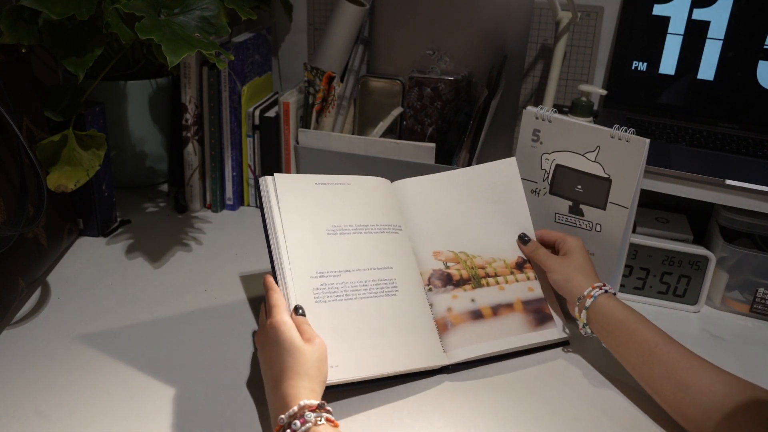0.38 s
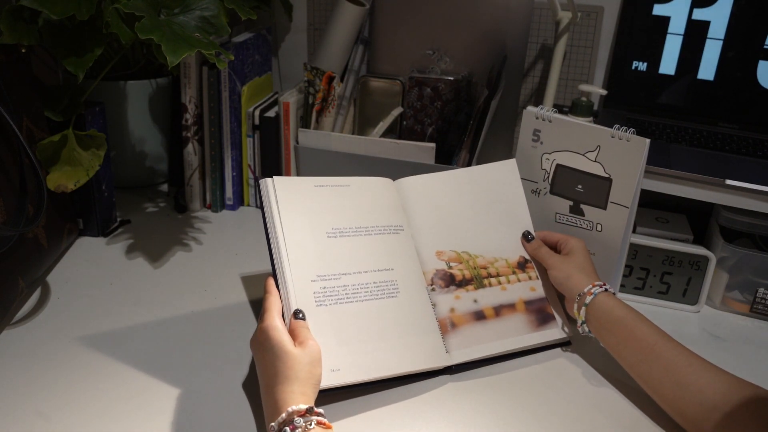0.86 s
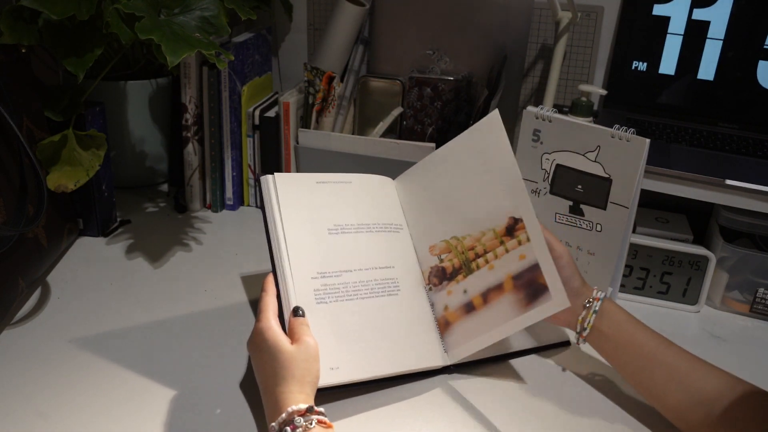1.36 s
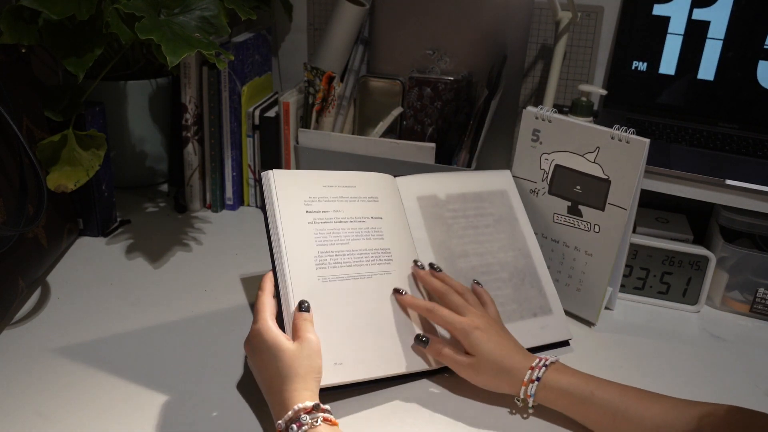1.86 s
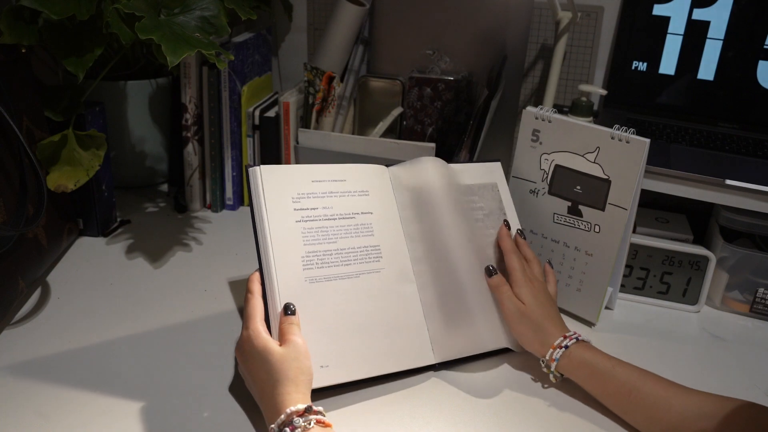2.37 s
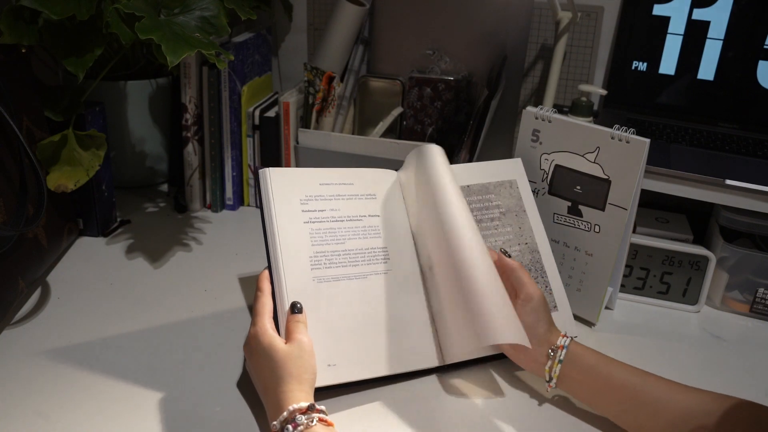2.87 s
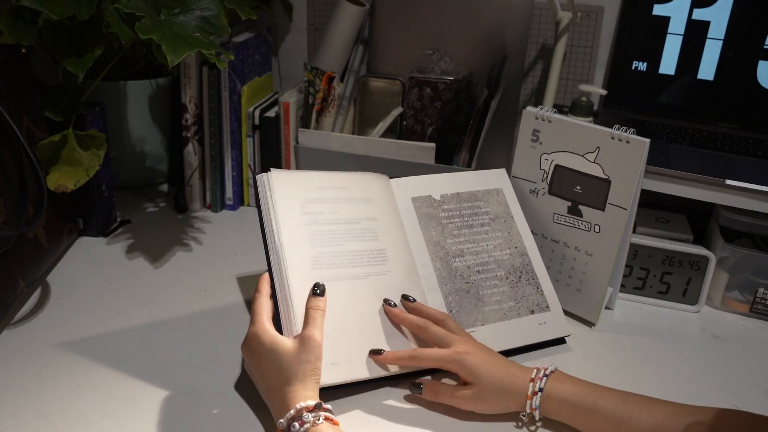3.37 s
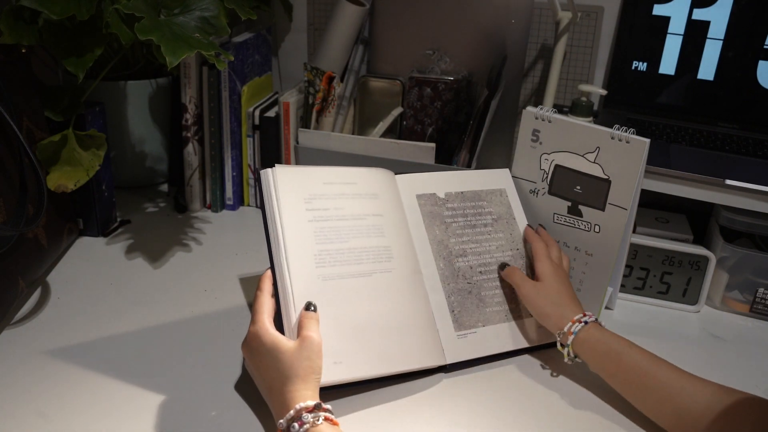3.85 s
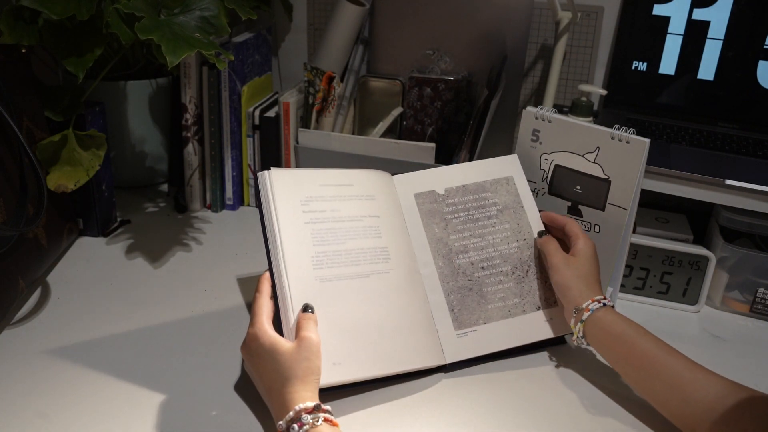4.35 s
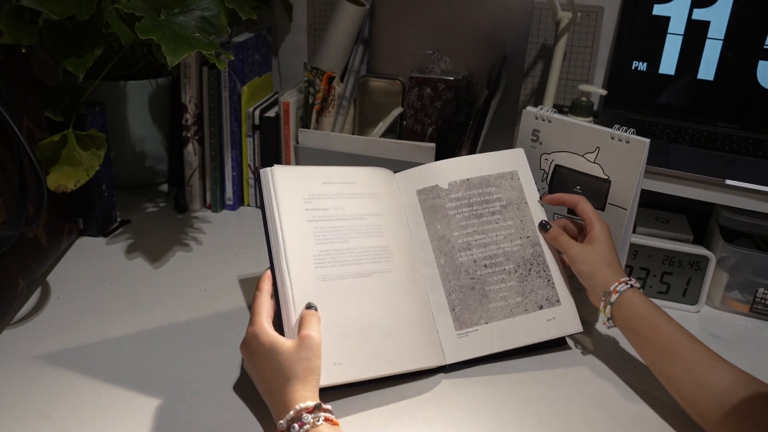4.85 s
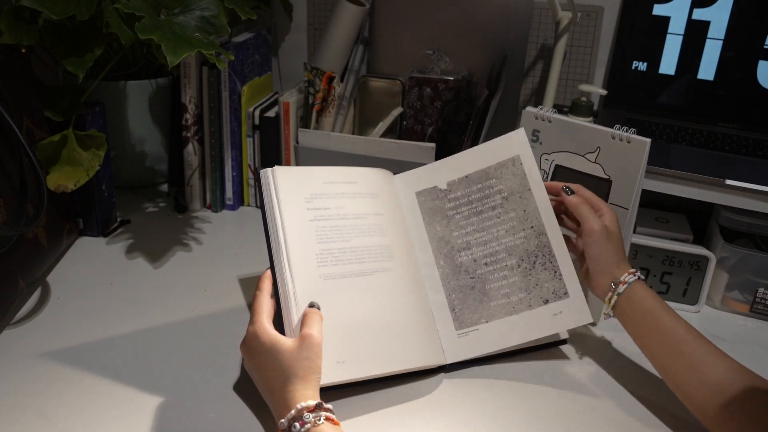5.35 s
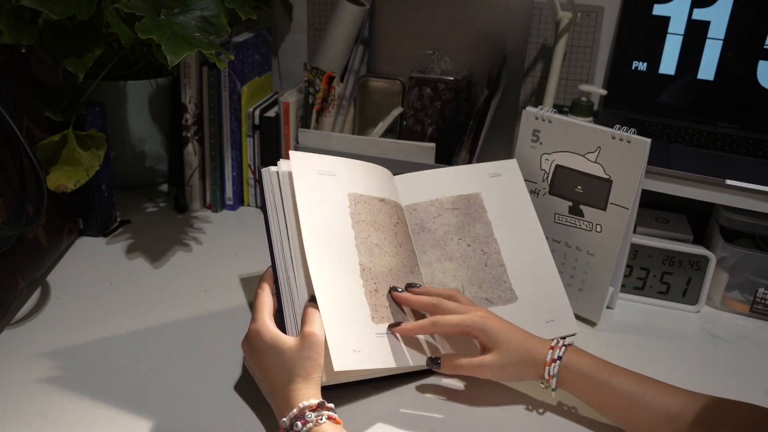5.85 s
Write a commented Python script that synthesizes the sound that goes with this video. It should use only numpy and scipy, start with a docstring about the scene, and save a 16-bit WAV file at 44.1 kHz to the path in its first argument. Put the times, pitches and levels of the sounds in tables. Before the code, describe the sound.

A thick book is handled close to two microphones in a small, quiet room with short, soft echoes and a faint low hum. From 0 to 1.2 s there are only light ticks and small scuffs as fingers pick at a stiff page. At about 1.25 s it lifts with a crackle; fluttering rustle and soft air puffs around 1.5 s lead to a firm snap at 1.65 s. A brief dry slide follows near 2 s, then a stronger hissing swish and crisp snaps at 2.3-2.5 s. The second turn is loudest: dense crackles at 2.8-3.05 s and two very sharp, bright snaps near 3.15 s. A hand smooths the paper with a dry hiss at 3.5-3.8 s. Mostly quiet picking with faint low ticks lasts until 4.9 s. Grainy rustles and small clicks return around 5-5.2 s, and a gentler, breathy page turn with light crackles runs from 5.4 s to the end.

```python
"""Sharp snaps and short crackles over a grainy rustle and a dry hiss: stiff pages of a thick book are picked at,
lifted, turned and smoothed by hand on a desk in a small quiet room, with a faint hum and room noise below.
Buckles ring the sheet by damped resonators; friction grains, filtered in bands, make rustle and hiss; air puffs
are swells of low noise. Two close microphones hear it, the right one a little earlier and brighter; dense
decaying echoes add the room."""
import sys
import numpy as np
from scipy import signal
from scipy.fft import rfft, irfft, next_fast_len
from scipy.io import wavfile

SR = 44100
rng = np.random.default_rng(int(sys.argv[2]) if len(sys.argv) > 2 else 0)


def generate_wav(signal):
    """Clip the signal to [-1, 1] and save it as 16-bit WAV at the path in sys.argv[1]."""
    frames = np.transpose(np.atleast_2d(signal))
    scaled = np.clip(frames, -1, 1) * 32767
    pcm = np.round(scaled).astype(np.int16)
    wavfile.write(sys.argv[1], SR, pcm)


def undo_db(level):
    """Turn decibels back into plain size, where 20 dB means ten times bigger."""
    steps = np.asarray(level, float) / 20
    return 10 ** steps


N = 263277   # length [samples]
EDGES_HZ = 20 * 2 ** np.arange(0, 10, .5)   # half-octave band edges

# Room noise: shape before scaling to AIR_DB (frequency [Hz], relative level [dB])
AIR_SHAPE = [(12, -32), (20, 0.5), (49, 0.5), (101, -8), (292, -4), (397, -13), (754, -10), (1110, -16.5),
             (1250, -18), (1950, -20), (7440, -28.5), (15800, -35.5)]
# Room noise at the two microphones (frequency [Hz], left-right likeness [0..1])
AIR_LIKENESS = [(60, 1), (240, 0.94), (950, 0.17), (3770, 0.0), (15000, 0.34)]
AIR_DB = -53   # rms
HUM_HZ, HUM_WIDTH_HZ, HUM_DB = 148, 5, -61.5

# Echoes at the two microphones (frequency [Hz], left-right likeness [0..1])
ECHO_LIKENESS = [(150, 1), (600, 0.84), (1500, 0.23), (4000, 0.025)]
# Time the echoes take to fall by 60 dB (frequency [Hz], time [s])
ECHO_T60 = [(300, 0.55), (1000, 0.19), (2800, 0.18), (7000, 0.15), (14000, 0.13)]
# Tone of the echoes (frequency [Hz], relative level [dB])
ECHO_COLOUR = [(200, -6), (1000, -1.5), (3000, -3), (8000, 3.5), (15000, 0)]
# Treble shading at the left microphone (frequency [Hz], gain [dB])
LEFT_SHADE = [(2500, 0), (4500, -.5), (8000, -6), (15000, -4)]
LEFT_LAG_S = 4.5e-5

# Air pushed out from under the page (time of the top [s], rms level before the swell [dB], centre [Hz])
PUFFS = [(.04, -49.5, 402), (0.699, -51, 61), (1.293, -46.5, 260), (1.556, -45, 143), (1.545, -42.5, 300),
         (1.57, -46, 327), (2.482, -46.5, 440), (2.561, -48.5, 270), (2.859, -47, 276), (3.03, -48, 304),
         (4.335, -50.5, 300), (5.62, -47, 283), (5.65, -46, 270)]

# A finger or a page slides, one stroke a row
# (start [s], length [s], sheet rustle level [dB], rustle centre [Hz], surface hiss level in mid-stroke [dB])
STROKES = [(0.0, 0.097, -55, 1250, -64), (0.327, 0.037, -64.5, 1500, -69), (0.585, 0.14, -55, 1180, -63.5),
           (0.99, .23, -56, 1050, -70), (1.311, 0.019, -45.5, 1180, -48), (1.41, 0.096, -42.5, 890, -56),
           (1.54, 0.13, -47, 1920, -44), (1.68, 0.16, -49.5, 1300, -55.5), (1.893, 0.013, -46.5, 1480, -42),
           (2.003, 0.056, -46.5, 2150, -48), (2.076, 0.079, -61.5, 2120, -54.5),
           (2.285, 0.15, -41.5, 2400, -37.5), (2.445, .15, -48, 1820, -40), (2.65, .11, -50, 1450, -55),
           (2.82, 0.065, -39, 1910, -44), (2.938, 0.023, -37, 2100, -37.5), (3.044, 0.07, -37.5, 1880, -68),
           (3.157, 0.016, -30, 2580, -49), (3.262, 0.086, -52, 2830, -53.5),
           (3.555, 0.12, -42.5, 2200, -38), (3.712, 0.078, -49.5, 2310, -46.5),
           (3.895, 0.032, -56, 1900, -49.5), (4.0, 0.015, -60, 895, -60), (4.443, 0.12, -60.5, 1330, -71),
           (4.938, 0.066, -46.5, 1370, -46.5), (5.104, 0.057, -43, 1420, -47),
           (5.33, 0.017, -58.5, 1340, -74), (5.408, 0.065, -51.5, 1720, -44.5), (5.529, .04, -51, 794, -54),
           (5.577, 0.059, -41.5, 1680, -44.5), (5.732, 0.064, -39, 2070, -42.5),
           (5.821, .1, -48, 1880, -49.5)]
# Tone of the surface hiss (frequency [Hz], relative level [dB])
HISS_SHAPE = [(1500, -48), (2500, 9.5), (4000, 4), (6000, 3.5), (8500, 4), (11000, -1.5), (15500, -8)]
RISE_DB_PER_S, FALL_DB_PER_S = 318, 207   # before and after a stroke
HISS_STEEPER, HISS_ARCH_DB = 1.14, 5   # the hiss follows speed: steeper flanks, loudest in mid-stroke
LET_GO_S, LET_GO_DB_PER_S = .012, 2500   # a stroke that starts this near a snap rises at this rate

# The sheet crinkles in a swelling burst (time of the top [s], rms level of the ring before the swell [dB],
# ring [Hz], edge level against the ring [dB], half length [s])
CRINKLES = [(0.021, -35, 1660, -16, 0.0051), (0.315, -46, 1600, -9, 0.0097),
            (0.466, -52.5, 1420, -6.5, 0.013), (0.601, -49.5, 1270, -27, 0.0073),
            (1.292, -30.5, 1120, -11, 0.0042), (1.415, -37, 670, -28, 0.0033),
            (2.568, -26, 1350, -7.5, 0.0068), (2.827, -21.5, 1750, -3, 0.0097),
            (2.851, -29.5, 1290, -10, 0.0079), (2.88, -31, 1670, -21, 0.0051),
            (3.035, -21.5, 2050, -36, 0.012), (3.725, -33, 2260, -27, 0.0072),
            (3.913, -46, 2400, 2.5, 0.0063), (4.984, -42, 1240, -28, 0.042), (5.131, -33, 1440, -6, 0.01),
            (5.434, -41, 744, -20, 0.01), (5.63, -43, 1520, -20, 0.022), (5.583, -34.5, 2840, -0.5, 0.007),
            (5.849, -36.5, 2460, -36, 0.015)]
# The sheet buckles (time [s], peak level of the ring [dB], ring [Hz], edge crack level against the ring [dB])
SNAPS = [(0.0167, -42, 1980.0, -25), (0.0312, -30, 1370, -21), (0.1209, -31.5, 1620, -13),
         (0.466, -29.5, 1430, -18), (0.4995, -38, 1960.0, -11), (0.669, -25, 1410, -5),
         (1.244, -28, 1040, -11), (1.2875, -21.5, 1810, -15), (1.2969, -26.5, 910, -21.0),
         (1.4105, -43, 745, 0), (1.464, -30, 1250, -2), (1.5125, -23.5, 750, -25), (1.523, -19, 1890, -7.5),
         (1.5305, -26, 1730, -8), (1.5372, -17, 1950, -5.5), (1.5474, -19.5, 1510, -5),
         (1.6528, -9.5, 1340, -14), (1.6574, -23, 1730, -30), (2.3343, -12.5, 1760, -25),
         (2.3726, -10.5, 2330, -12), (2.38, -23, 2300, -22), (2.4231, -20.5, 1330, -10),
         (2.472, -12, 1340, -6.5), (2.4797, -8, 1530, -26), (2.6484, -25.5, 1030, -23.0),
         (2.7112, -22, 2160, -18), (2.7193, -23.5, 1240, -22.0), (2.8371, -7, 1930, -27),
         (2.8522, -10.5, 2460, -2), (2.8649, -10.5, 1540, 1), (2.8697, -8.5, 1850, -1),
         (2.8983, -3.5, 1980, -25), (2.9045, -6.5, 2450, -12), (2.912, -14, 2190, -7),
         (2.973, -11.5, 2520, -17), (3.0096, -18.5, 1540, -23), (3.0253, -11.5, 2330, -12),
         (3.15, -2.5, 2900, -11), (3.163, -4.5, 2950, -8.5), (3.216, -24, 2870.0, -15),
         (3.3084, -25.5, 3030, -18), (3.8952, -35.5, 2150, -13), (4.3322, -28.5, 726, -22),
         (4.413, -33, 630, -29), (4.4791, -30.5, 1700, -13), (5.1941, -29, 1760, -8),
         (5.209, -29, 1680, -6), (5.4034, -28, 1450, 2.5), (5.5715, -33, 2340, -7), (5.7099, -38, 2230, -8),
         (5.917, -33, 3520, -11)]
SHEET_CYCLES = 3.5   # cycles in which the main ring falls by 60 dB
EDGE_HZ = (4800, 8500)   # band of the page edge
CUTOFF_HZ = 16300   # from here up the low-pass takes away at least 50 dB


def rms_one(x):
    """Scale to rms 1."""
    return x / np.sqrt(np.mean(x ** 2) + 1e-20)


def at_hz(points, hz):
    """Read a table on a log-frequency axis."""
    table_hz, value = np.array(points).T[:2]
    return np.interp(np.log(hz), np.log(table_hz + 1), value)


def drift(rate):
    """Slow random wander of rms 1, low-passed near the rate in Hz."""
    pole = np.exp(-40 * np.pi * rate / SR)
    draws = rng.standard_normal(N // 20 + 2002)   # one draw in 20 samples
    slow = signal.lfilter([1], [1, -2 * pole, pole * pole], draws)[2000:]
    return np.interp(np.arange(N) / 20, np.arange(len(slow)), rms_one(slow))


def ring(x, hz, t60):
    """Damped resonator: a unit click sets a sine ringing that falls by 60 dB in t60 seconds."""
    r, w = undo_db(-60 / (t60 * SR)), 2 * np.pi * hz / SR
    return signal.lfilter([0, np.sin(w)], [1, -2 * r * np.cos(w), r * r], x + 1e-18)


def bands(source):
    """Half-octave bands of two unrelated sources dealt in turn: (centre Hz, band)."""
    for k, (low, high) in enumerate(zip(EDGES_HZ, EDGES_HZ[1:])):
        sos = signal.butter(2, [low, high], "band", fs=SR, output="sos")
        yield np.sqrt(low * high), signal.sosfilt(sos, source[k % 2])


def spread(pair, alike):
    """Mix two unrelated noises into left and right of a given likeness."""
    alike = np.clip(alike, 0, 1)
    return np.sqrt(1 + alike) * pair[0] + np.sqrt(1 - alike) * pair[1] * [[1], [-1]]


def air():
    """Steady room noise in bands, and a narrow wavering hum from a resonator driven by noise."""
    noise = 0
    for hz, pair in bands(rng.standard_normal((2, 2, N))):
        gain = undo_db(at_hz(AIR_SHAPE, hz) + 0.26 * drift(52))
        noise = noise + gain * spread(pair, at_hz(AIR_LIKENESS, hz))
    hum = ring(rng.standard_normal(N), HUM_HZ, 2.2 / HUM_WIDTH_HZ)
    return undo_db(AIR_DB) * rms_one(noise) + undo_db(HUM_DB) * rms_one(hum)


def echoes(first_s=0.0035):
    """Dense reflections that die band by band, after a short gap."""
    t = np.arange(SR // 2) / SR
    echo = 0
    for hz, pair in bands(rng.standard_normal((2, 2, len(t)))):
        fall_db = 60 * t / at_hz(ECHO_T60, hz)
        echo = echo + undo_db(at_hz(ECHO_COLOUR, hz) - fall_db) * spread(pair, at_hz(ECHO_LIKENESS, hz))
    echo = echo * np.clip(t / first_s - 1, 0, 1)
    return echo / np.sqrt(np.sum(echo ** 2) / 2)


def room(x, count=5):
    """The sounding spot wanders over the page: the sound fades from one set of echo paths to the next."""
    turn = np.arange(N) / SR / .011   # a new set every 11 ms, in a cycle
    wet = 0
    for k in range(count):
        share = np.clip(1 - np.abs((turn - k) % count - 1), 0, 1)
        wet = wet + signal.fftconvolve((share * x)[None], echoes(), axes=1)[:, :N]
    return wet


def puffs(half_s=0.012, cycles=4.9):
    """Air pushed out from under the page: a short swell of low noise around one pitch."""
    out, t = np.zeros(N + 4096), np.arange(-2048, 2048) / SR
    for (s, rms_db, hz), shake in zip(PUFFS, rng.standard_normal((len(PUFFS), 8192))):
        once = ring(shake, hz, cycles / hz)
        low = rms_one(ring(once, hz, cycles / hz)[4096:])
        swell = np.exp(-(t / max(half_s, 3.7 / hz)) ** 2 / 2)   # low pitches swell longer
        at = round(s * SR)
        out[at:at + 4096] += undo_db(rms_db) * low * swell
    return out[2048:N + 2048]


def grains(per_s, scatter_db, clump_db, channels):
    """Stick-slip clicks of uneven size that come in clumps."""
    born = rng.random((channels, N)) < per_s * undo_db(clump_db * drift(40)) / SR
    size_db = scatter_db * np.minimum(rng.exponential(1, (channels, N)), 4)
    sizes = undo_db(size_db) * rng.choice([-1, 1], (channels, N))
    return rms_one(born * sizes + 1e-9)


def strokes():
    """Each stroke rises, holds and falls; overlapping strokes add and the louder one dominates the centre."""
    t, snap_s = np.arange(0, N + 64, 64) / SR, np.array(SNAPS)[:, 0]
    start, length, rustle_db, hz, hiss_db = np.array(STROKES).T[:, :, None]
    sudden = np.min(np.abs(start - snap_s), axis=1, keepdims=True) < LET_GO_S
    rise_db = np.where(sudden, LET_GO_DB_PER_S, RISE_DB_PER_S) * np.clip(start - t, 0, None)
    flank_db = rise_db + FALL_DB_PER_S * np.clip(t - start - length, 0, None)
    off_middle = np.clip(2 * (t - start) / length - 1, -1, 1)
    # powers, so that strokes add as unrelated sounds
    rustle = undo_db(np.maximum(rustle_db - flank_db, -200)) ** 2
    hiss = undo_db(hiss_db - HISS_STEEPER * flank_db - HISS_ARCH_DB * off_middle ** 2) ** 2
    centre_hz = np.exp(np.sum(rustle * np.log(hz), axis=0) / rustle.sum(axis=0))
    curves = (np.sqrt(rustle.sum(axis=0)), centre_hz, np.sqrt(hiss.sum(axis=0)))
    return [np.interp(np.arange(N) / SR, t, curve) for curve in curves]


def sliding(below_db=4.0, above_db=7.5, focus_db=0.0, patchy_db=2.5):
    """Friction grains shake the sheet around a moving centre (slopes per octave) and hiss on its surface."""
    rustle_gain, centre_hz, hiss_gain = strokes()
    rustle, power, hiss = 0, 0, 0
    for hz, band in bands(grains(3000, scatter_db=2.5, clump_db=4.5, channels=2)):
        if hz > 300:
            octaves = np.log2(hz / centre_hz)
            slope_db = np.minimum(below_db * octaves, -above_db * octaves)
            gain = undo_db(slope_db + focus_db * np.exp(-(octaves / 0.26) ** 2))
            patches = undo_db(patchy_db * (drift(32) + drift(7.2)))
            rustle = rustle + gain * patches * band
            power = power + gain ** 2 * band.var()
    fine = grains(9000, scatter_db=2.5, clump_db=5.0, channels=4).reshape(2, 2, N)
    for hz, pair in bands(fine):
        if hz > 1200:
            flicker_db = 1.5 * drift(30)
            # a wide contact: the two sides differ
            hiss = hiss + undo_db(at_hz(HISS_SHAPE, hz) + flicker_db) * spread(pair, 0.05)
    return rustle_gain * rustle / np.sqrt(power), hiss_gain * rms_one(hiss)


def sheet(slips, hz):
    """A soft buckle rings the sheet a few cycles at two pitches; it radiates no bass."""
    sos = signal.butter(2, [0.63 * hz, 3.18 * hz], "band", fs=SR, output="sos")
    soft = signal.sosfilt(sos, slips)
    upper = ring(soft, 1.48 * hz, SHEET_CYCLES / hz / 1.92)
    return ring(soft, hz, SHEET_CYCLES / hz) + 1.3 * upper


def edge(fizz):
    """The free edge of the page sounds mainly in the treble."""
    return signal.sosfilt(signal.butter(1, EDGE_HZ, "band", fs=SR, output="sos"), fizz)


def crinkles(spiky=1.43):
    """Many small buckles of uneven size swell and fade."""
    out, t = np.zeros((2, N + 8192)), np.arange(-4096, 4096) / SR
    noise = rng.standard_normal((len(CRINKLES), 2, 8192))
    for (s, rms_db, hz, edge_db, half), shake in zip(CRINKLES, noise):
        slips = shake * np.abs(shake[0]) ** spiky
        body = rms_one(sheet(slips[0], hz))
        burst = body + undo_db(edge_db) * rms_one(edge(spread(slips, 0.043)))
        at = round(s * SR)
        out[:, at:at + 8192] += undo_db(rms_db) * burst * np.exp(-(t / half) ** 2 / 2)
    return out[:, 4096:N + 4096]


def snaps(flutter_db=-8.5, flutter_s=0.0072, crack_s=0.0013):
    """One buckle rings the sheet, which flutters as it settles; the edge adds a crack, unlike on the two sides."""
    out, t = np.zeros((2, N + 4096)), np.arange(4096) / SR
    noise = rng.standard_normal((len(SNAPS), 3, 4096))
    for (s, peak_db, hz, edge_db), (shake, *fizz) in zip(SNAPS, noise):
        # weak buckles are scuffs: less click, more flutter
        flutter = undo_db(flutter_db - 0.18 * (peak_db + 12.0)) * np.exp(-t / flutter_s)
        slips = shake * flutter * np.sqrt(hz / SR)
        slips[0] = -1   # the click of the buckle itself
        body = sheet(slips, hz)
        crack = edge(spread(fizz, 0.14) * (np.exp(-t / crack_s) + 1.7 * flutter))
        snap = body / np.abs(body).max() + undo_db(edge_db) * crack / np.abs(crack).max()
        at = round(s * SR)
        out[:, at:at + 4096] += undo_db(peak_db) * snap
    return out[:, :N]


def scene():
    """The direct sound reaches the left microphone a little late; the room follows."""
    rustle, hiss = sliding()
    book = snaps() + crinkles() + rustle + puffs() + hiss
    size = next_fast_len(N)
    hz = np.arange(size // 2 + 1) * SR / size + 1   # 1 Hz up, to keep the logarithm finite
    lag = np.exp(-2j * np.pi * hz * LEFT_LAG_S)
    late = irfft(rfft(book[0], size) * lag, size)[:N]
    heard = np.array([late, book[1]]) + undo_db(-4.5) * room(book[1])
    # the left port is shaded in the treble
    heard[0] = irfft(rfft(heard[0], size) * undo_db(at_hz(LEFT_SHADE, hz)), size)[:N]
    return heard + air()


def top_cut(x):
    """Nothing passes above the cut-off."""
    return signal.sosfilt(signal.butter(12, 16980, fs=SR, output="sos"), x)


def record(dry):
    """A steep low-pass cuts the top of what the microphones hear."""
    low_pass = signal.cheby2(12, 50, CUTOFF_HZ, fs=SR, output="sos")
    mix = signal.sosfilt(low_pass, dry)
    return top_cut(mix)


dry = scene()
out = record(dry)
generate_wav(out)
```